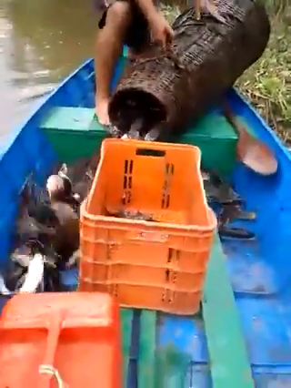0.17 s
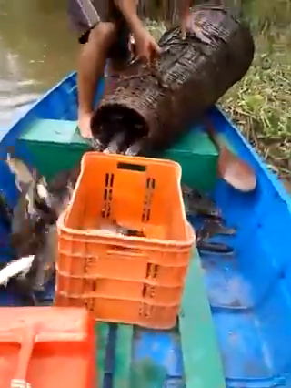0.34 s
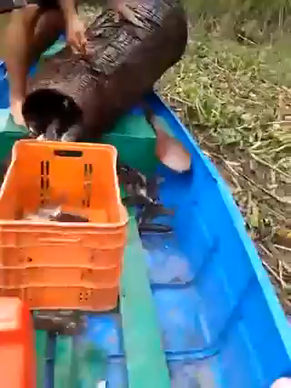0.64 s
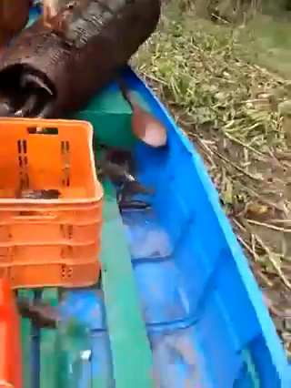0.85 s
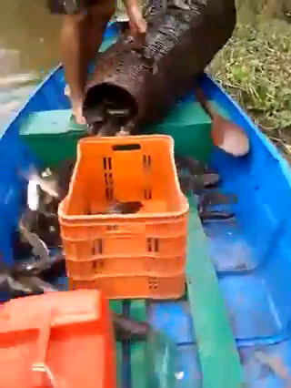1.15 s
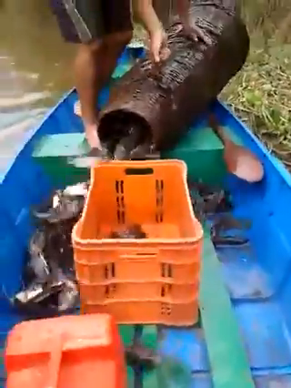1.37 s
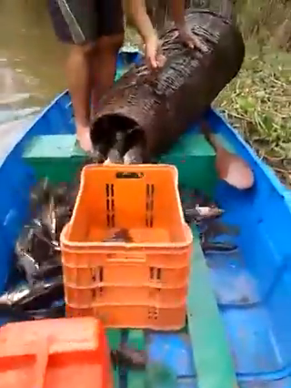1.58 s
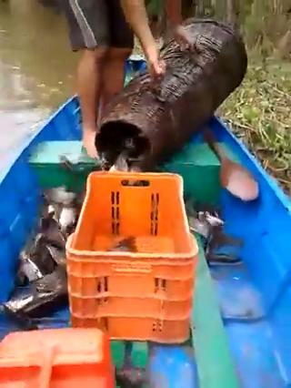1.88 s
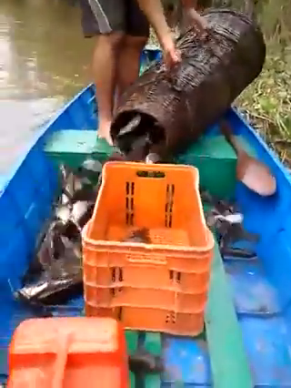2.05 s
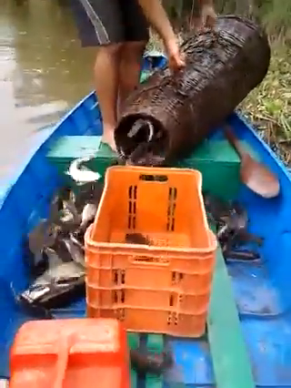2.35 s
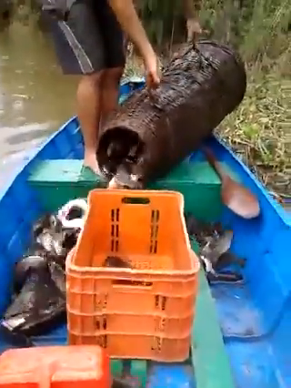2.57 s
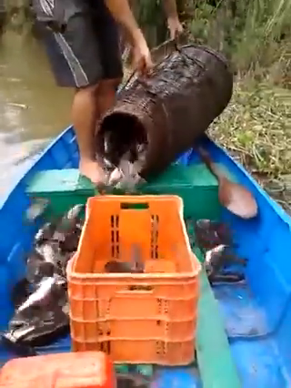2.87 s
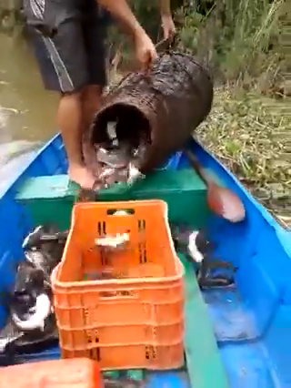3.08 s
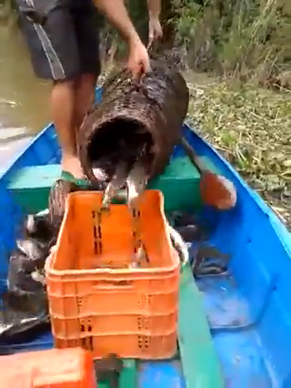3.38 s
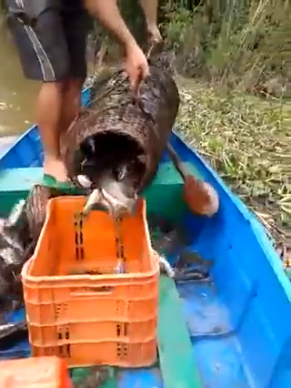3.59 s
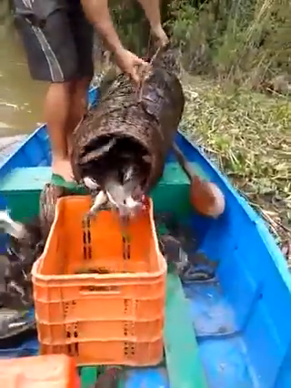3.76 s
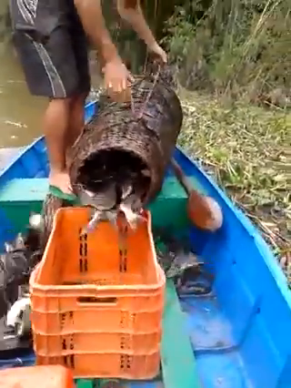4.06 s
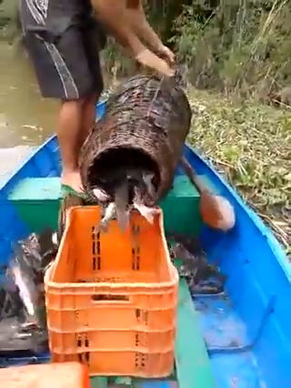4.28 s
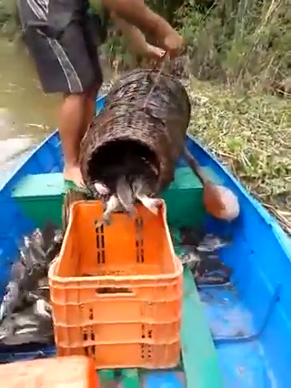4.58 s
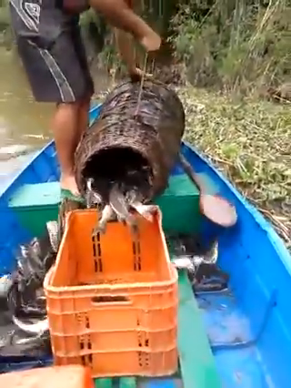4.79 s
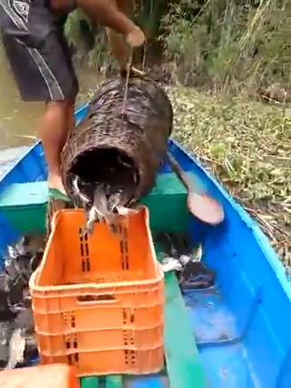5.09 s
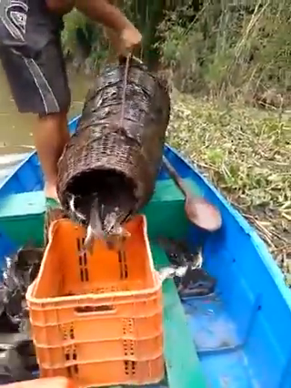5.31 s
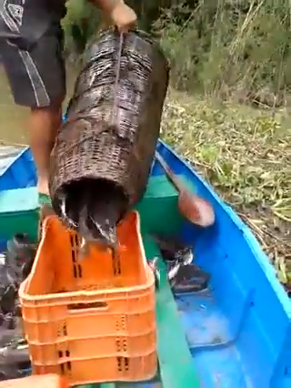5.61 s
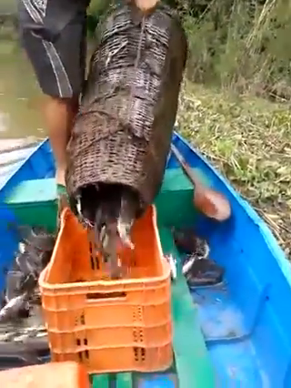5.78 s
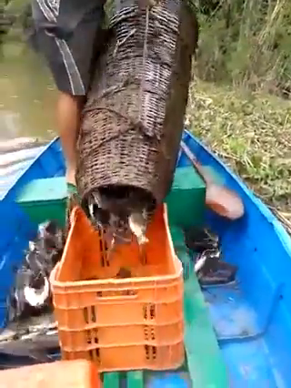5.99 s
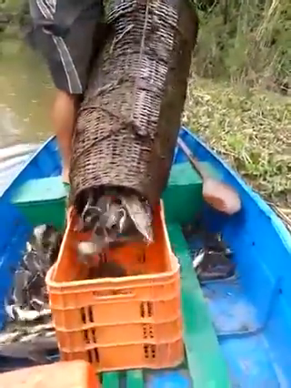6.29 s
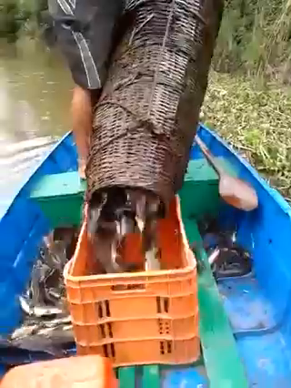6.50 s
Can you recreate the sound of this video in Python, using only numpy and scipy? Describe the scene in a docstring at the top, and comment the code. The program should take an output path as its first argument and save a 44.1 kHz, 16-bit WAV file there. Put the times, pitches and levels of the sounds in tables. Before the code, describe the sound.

Live fish thrash in an open boat and a plastic crate: dull hollow thuds, wet tail slaps and hard knocks, easing, then a late flurry.

```python
"""Dull thuds, wet slaps and hard knocks: live fish thrash in an open boat and drop into a plastic crate,
a couple of metres from a phone. Soft bodies thud on the hull, which booms in its low modes; bony parts
tap the plastic, made as short swings that ring the crate. Wet tails slap and splatter, made as bursts of
noise and tiny droplets. Underneath, a heap of fish drums, slithers and drips; a thin hiss flickers on top."""
import sys
import numpy as np
from scipy import signal
from scipy.fft import rfft, irfft
from scipy.io import wavfile
from scipy.ndimage import uniform_filter1d

SR = 44100
rng = np.random.default_rng(int(sys.argv[2]) if len(sys.argv) > 2 else 0)


def field_ratio(decibels):
    """Amplitude ratio for a level in dB (20 dB per decade); scalars and array-likes work."""
    return 10 ** (np.asarray(decibels, dtype=float) / 20)


def master(y):
    """Save y as 16-bit WAV."""
    cut = np.clip(np.atleast_2d(y).T, -1, 1)
    pcm = np.round(cut * 32767)  # scale
    wavfile.write(sys.argv[1], SR, pcm.astype(np.int16))


N = 293078  # length in samples
T = np.arange(N) / SR  # time in seconds
COMMON = 0.88  # random sizes leave out the rarest, largest ones
CREST_DB = 12.0  # a noise burst peaks about this far over its rms


def unit(x):
    """Scale to rms 1."""
    return x / np.sqrt(np.mean(x ** 2))


def colour(x, points):
    """Filter by (Hz, dB) points joined on a log frequency axis."""
    hz, db = np.transpose(points)
    bins = np.arange(N // 2 + 1) * SR / N + 1  # 1 Hz up, so that the log exists at zero
    gain = field_ratio(np.interp(np.log(bins), np.log(hz), db))
    return irfft(rfft(x) * gain, N)


def hiss(points):
    """Coloured noise, rms 1."""
    return unit(colour(rng.standard_normal(N), points))


def add(track, s, sound):
    """Mix a short sound in at time s, in seconds."""
    i = max(int(s * SR), 0)
    track[i:i + len(sound)] += sound[:N - i]


def modes(table):
    """The ring of a struck object: each mode is a sine that fades by 60 dB in its own time."""
    t = T[:SR // 2]
    return sum(field_ratio(db) * hz / SR * np.sin(2 * np.pi * hz * t) * 1000. ** (-t / t60)
               for hz, db, t60 in table)


def random_gain(size, spread_db):
    """Turn even random numbers into gains: mostly small, a few large."""
    return field_ratio(-spread_db * np.log(1 - COMMON * size))


def bursts(per_s, spread_db, rise_s, fade_s):
    """Envelope of bursts at random times: each starts quickly and fades exponentially."""
    when, size = rng.random((4000, 2)).T
    count = int(per_s * N / SR)
    starts = np.zeros(N)
    starts[(when[:count] * N).astype(int)] = random_gain(size[:count], spread_db)
    t = T[:SR // 5]
    shape = (1 - np.exp(-t / rise_s)) ** 2 * np.exp(-t / fade_s)
    return signal.fftconvolve(starts, shape)[:N]


def patter(per_s, spread_db, cycles, low_hz, high_hz, points):
    """Tiny wet contacts: each rings a few cycles at a pitch of its own; coloured, rms 1."""
    out = np.zeros(N)
    for when, size, pitch in rng.random((6000, 3))[:int(per_s * N / SR)]:
        hz = low_hz * (high_hz / low_hz) ** pitch
        turns = hz * T[:int(8 * cycles * SR / hz)]
        swell = turns / cycles * np.exp(-turns / cycles)
        # equal energy per Hz, so that the colour alone sets the spectrum
        gain = random_gain(size, spread_db) * hz
        add(out, when * N / SR, gain * swell * np.sin(2 * np.pi * turns))
    return unit(colour(out, points))


def thuds():
    """A soft body presses a panel for a swing or two; flesh adds a rougher knock; bone taps and cracks."""
    # Body blows on hull and crate. Each row: start in seconds, peak of the swing in dB,
    # pitch of the struck panel in Hz, knock in dB relative to the swing.
    blows = [(0.001, -15.5, 160, -11), (0.021, -20, 265, -1), (0.043, -20.5, 161, -1),
             (0.124, -24.5, 168, 3.5), (0.148, -16.5, 283, -10), (0.163, -14.5, 267, -4.5),
             (0.183, -18.5, 150, -6), (0.262, -24.5, 252, -2), (0.283, -21, 215, -1),
             (0.305, -15.5, 167, -14), (0.326, -18.5, 203, -14), (0.41, -30, 304, 12),
             (0.435, -24.5, 133, 12), (0.461, -16.5, 329, -39), (0.48, -24.5, 319, -23),
             (0.518, -18, 160, -34), (0.539, -23, 319, 0), (0.597, -25.5, 155, 4.5), (0.622, -20, 182, -21),
             (0.697, -9, 159, -10), (0.715, -17.5, 166, -20), (0.798, -17.5, 156, -4.5),
             (0.882, -33, 118, -5), (1.018, -19, 152, -27), (1.0322, -16.5, 182, -19),
             (1.15, -22, 222, -11), (1.222, -16, 121, -11), (1.24, -11.5, 48, -22), (1.248, -9, 140.5, -4),
             (1.268, -10, 347, -1.5), (1.299, -14, 125, -32), (1.331, -23, 198, 4.5),
             (1.362, -15.5, 125, -14), (1.393, -23, 139, -5), (1.427, -22, 155, -6), (1.456, -18, 148, -5),
             (1.588, -10, 152, -14), (1.608, -13, 128, -11), (1.759, -7.5, 193, -7),
             (1.778, -13.5, 161, -27), (1.793, -20, 204, -10), (1.833, -20.5, 178, 1),
             (1.865, -20.5, 332, -2), (1.88, -24.5, 332, -12), (2.044, -15.5, 167.6, -2),
             (2.073, -22.5, 197, -22), (2.096, -20, 198, -25), (2.111, -21.5, 165, -22),
             (2.174, -27, 199, 6.5), (2.23, -22.5, 221, -1), (2.259, -27, 148, -17.5),
             (2.296, -27, 310, 2.5), (2.305, -22, 134, -17), (2.342, -20.5, 151, -9),
             (2.398, -29, 281, 12.5), (2.509, -27.5, 245, 4.5), (2.546, -24.5, 325, 7),
             (2.569, -28.5, 196, -3), (2.768, -2, 166, -9.5), (2.79, -18.5, 171, -7.5),
             (2.88, -26.5, 229, 8), (2.926, -5, 277, -4.5), (2.941, -9.5, 280, -5.5), (2.954, -16, 263, -4),
             (2.968, -8, 160, -11), (2.98, -13, 245, -9), (2.993, -15.5, 163, -8), (3.01, -22.5, 153, -1),
             (3.031, -19, 170, -17), (3.053, -27.5, 219, -8), (3.169, -18.5, 250, -1),
             (3.181, -17, 164, -14), (3.2, -22.5, 244, -3.5), (3.234, -24.5, 178, -8),
             (3.358, -23.5, 143, 3.5), (3.41, -21.5, 112, -2), (3.44, -21, 207, -13),
             (3.516, -20, 114, -2.5), (3.567, -15, 209, -5.5), (3.59, -19, 198, -18), (3.746, -29, 316, -4),
             (3.815, -22, 160, 1.5), (3.842, -31.5, 245, 10.5), (3.888, -20, 290, 0.5),
             (3.908, -28.5, 334, 7), (3.922, -22, 327, -13), (3.945, -26, 318, -36), (4.001, -28, 366, 3.5),
             (4.092, -34, 304, 2), (4.422, -31, 96, 0), (4.447, -25, 152, -0.5), (4.464, -35.5, 160, 5),
             (4.557, -25.5, 157, -9), (4.624, -35, 290, 6), (4.642, -23.5, 173, -9.5),
             (4.917, -29.5, 162, -14), (4.94, -28.5, 150, -0.5), (5.078, -31, 430, -11),
             (5.115, -22.5, 202, -3), (5.137, -23, 190.6, -18), (5.546, -32, 220, 0),
             (5.576, -29, 138, -7.5), (5.591, -29.5, 170, -4), (5.66, -27, 178, -8),
             (5.719, -34.5, 286, 10.5), (5.948, -30.5, 273, 3), (5.997, -32, 197, -2),
             (6.073, -23.5, 166, 2.5), (6.101, -25, 201, -2.5), (6.117, -34, 199, -16),
             (6.242, -29, 140, 1), (6.3, -19.5, 397, -6), (6.317, -18, 346, -1), (6.34, -7.5, 282, -7.5),
             (6.357, -8.5, 273, -15), (6.369, -11.5, 184, -14), (6.383, -20.5, 159, -14),
             (6.401, -13.5, 157, -17), (6.462, -18, 254, 0), (6.473, -23, 173, -12), (6.49, -20, 192, -8),
             (6.521, -30, 256, -1), (6.546, -31, 253, -11.5), (6.561, -40, 196, -11),
             (6.594, -19.5, 140, -25), (6.616, -34.5, 198, 4), (6.625, -25.5, 393, -12.5)]
    # Hard taps of a head or spine on plastic. Each row: start in seconds, peak in dB,
    # pitch in Hz, contact time in milliseconds.
    bone_taps = [(0.13, -31, 770, 1.7), (0.153, -23, 775, 1.4), (0.282, -27, 790, 0.9),
                 (0.439, -19.5, 573, 1.9), (0.525, -30.5, 865, 1.8), (0.864, -37, 788, 11),
                 (0.91, -36, 790, 6.5), (0.979, -33.5, 775, 2.5), (1.031, -8.5, 650, 0.77),
                 (1.188, -28.5, 1094, 2.1), (2.03, -28, 770, 2), (2.136, -30, 1000, 2),
                 (2.175, -28, 1000, 0.97), (2.295, -25, 590, 1.2), (2.3985, -16, 900, 1),
                 (2.4015, -13, 600, 0.8), (2.408, -16.5, 450, 0.91), (2.7725, -11.5, 714, 1.6),
                 (2.884, -23, 874, 1.4), (2.932, -7, 700, 0.58), (2.937, -17.5, 1364, 1.8),
                 (2.942, -12.5, 774, 1.6), (2.95, -22.5, 1090, 1.3), (2.965, -17, 840, 1.1),
                 (3.265, -33.5, 795, 3.6), (3.448, -27, 950, 1.2), (3.525, -35, 960, 1.9),
                 (3.83, -28, 1050, 1.8), (5.078, -27, 610, 0.79), (5.083, -23.5, 595, 0.49),
                 (5.122, -26, 950, 1), (5.549, -26.5, 603, 0.76), (5.724, -27.5, 597, 0.5),
                 (6.245, -25, 790, 1.2), (6.266, -27, 800, 1.5), (6.305, -39.5, 990, 0.43),
                 (6.343, -28, 905, 1.5), (6.461, -22.5, 940, 1.1), (6.494, -34, 900, 1.3)]
    # Ringing of the plastic crate. Each row: pitch in Hz, relative level in dB,
    # time to fade by 60 dB in seconds.
    crate_modes = [(479, -26, 0.075), (590, -22, 0.14), (797, -19, 0.095), (1040, -24.5, 0.047),
                   (1326, -29.5, 0.09), (1490, -23, 0.08), (1841, -30, 0.04)]
    contact_s = 0.0089
    peak_at, fade_shape = 0.81, 1.16  # peak in contact times; shape 1 = exponential fade, 2 = abrupt
    crack_db, crack_db_per_ms = -9.5, -12.5  # relative to the tap; a longer contact cracks less
    crack_fade_s = 0.0011
    force, knock, tap, crack = np.zeros((4, N))
    t = T[:SR // 5]
    for s, db, hz, knock_db in blows:
        u = t / contact_s
        fade = np.exp(2 * (1 - (u / peak_at) ** fade_shape) / fade_shape)
        press = u ** 2 * fade / peak_at ** 2
        add(force, s, -field_ratio(db) * press * np.sin(2 * np.pi * hz * t))
        add(knock, s, field_ratio(db + knock_db - CREST_DB) * u ** 2 * np.exp(2 - 1.615 * u))
    for s, db, hz, ms in bone_taps:
        u = t * 1000 / ms
        press = u ** 1.5 * np.exp(1.66 * (1 - u))
        add(tap, s, -field_ratio(db) * press * np.sin(2 * np.pi * hz * t))
        add(crack, s, field_ratio(db + crack_db + crack_db_per_ms * ms) * np.exp(-t / crack_fade_s))
    flesh = hiss([(50, -14.5), (200, 4.0), (450, -2.0), (1000, -17.5), (1600, -28.5),
                  (3000, -49.0), (6000, -97.0)])
    dry_crack = hiss([(600, -5), (1500, -3.0), (5000, -8), (10000, -20.5), (16000, -15.0)])
    crate = signal.fftconvolve(tap, modes(crate_modes))[:N]
    return hull(force + knock * flesh + tap) + crate + crack * dry_crack


def hull(force):
    """The blows, the ringing they leave in the hull's modes, and the dull rattle of ribs and boards."""
    # Ringing of the hull. Each row: pitch in Hz, relative level in dB, time to fade by 60 dB in seconds.
    hull_modes = [(120.6, 7, 0.29), (152, -19, 0.68), (177, 7.5, 0.12), (212, -21.5, 0.059),
                  (326, -8.5, 0.9), (381.7, 0, 0.67), (516, -1, 0.55), (575, 13.5, 0.029),
                  (800, -5.5, 0.062), (1550, -31, 0.065)]
    t = T[:SR // 2]
    rattle = hiss([(40, -6.0), (150, -3.5), (400, -2.5), (900, -10.0), (1600, 0.5), (5000, -15.0)])[:len(t)]
    rattle = rattle * (1 - np.exp(-t / 0.0028)) * 1000. ** (-t / 0.21)
    ring = field_ratio(-20.5) * modes(hull_modes) + field_ratio(-43.5) * rattle
    return force + signal.fftconvolve(force, ring)[:N]


def slaps():
    """A wet tail slap: droplets over hiss swell in a few milliseconds; flat slaps carry more middle."""
    # Wet tail slaps. Each row: time in seconds, peak in dB, middle in dB relative to that peak.
    tail_slaps = [(0.001, -29.5, 3.5), (0.022, -41.5, 18.5), (0.039, -44.5, 3.5), (0.093, -37, 11),
                  (0.1503, -34.5, 9), (0.176, -41, 14), (0.241, -43, -10), (0.2596, -52.5, 22),
                  (0.2865, -34.5, 6), (0.306, -46.5, 17), (0.369, -40, 13.5), (0.3965, -36.5, 5),
                  (0.4334, -34, 6.5), (0.462, -40.5, -12), (0.524, -43, 8.5), (0.5427, -37, -5),
                  (0.593, -51.5, 14.5), (0.619, -40.5, 14), (0.656, -52, 21.5), (0.69, -32, 4.5),
                  (0.736, -46, 11), (0.781, -39, 7.5), (0.838, -38, -5), (0.862, -34.5, 6),
                  (0.9354, -40, 13.5), (0.899, -35, 5), (0.974, -38, 11.5), (0.994, -35.5, -4),
                  (1.1118, -45.5, 21), (1.157, -35, -29), (1.245, -42.5, 13.5), (1.27, -54, 28),
                  (1.329, -44, 11), (1.357, -56, 20), (1.424, -42, 10.5), (1.463, -37, 8.5),
                  (1.5, -38.5, -4), (1.574, -33, 6), (1.632, -54, 28), (1.659, -33.5, -10),
                  (1.708, -36.5, 6), (1.7285, -27.5, 3.5), (1.7555, -25.5, 2.5), (1.816, -34.5, 8),
                  (1.841, -36, 14.5), (2.041, -37, 7.5), (2.138, -38.5, -9), (2.167, -34, 11),
                  (2.232, -36.5, -13), (2.2918, -33, -25), (2.397, -26, 8), (2.461, -39.5, 7.5),
                  (2.4992, -43, 14), (2.616, -38, 8.5), (2.685, -39, 8), (2.797, -39.5, -10),
                  (2.879, -38, 11), (2.929, -21, 9.5), (3.052, -42, 11), (3.105, -39, -23),
                  (3.143, -32.5, -1), (3.229, -44, 9), (3.327, -44.5, 16.5), (3.352, -31, 6.5),
                  (3.429, -42, 16.5), (3.452, -57, 15), (3.498, -42, 10.5), (3.521, -38, 11.5),
                  (3.607, -38, 8), (3.83, -27, 7), (3.9, -42.5, 14.5), (3.928, -35, 5.5), (4.001, -35, 9.5),
                  (4.021, -35.5, -25), (4.064, -42, 4), (4.172, -44.5, 14.5), (4.442, -38.5, 10.5),
                  (4.622, -42, 10), (4.6397, -38, 3.5), (4.789, -46, 7), (4.958, -55.5, 22),
                  (5.081, -45.5, 12.5), (5.1217, -31.5, 6), (5.286, -41, 5), (5.5977, -36, -10),
                  (5.627, -40, 13.5), (5.665, -43, 8), (5.725, -39, 10.5), (5.92, -43.5, 6),
                  (5.9904, -35.5, -12), (6.074, -58, 24.5), (6.244, -36, 4.5), (6.265, -36.5, 6.5),
                  (6.3022, -19, 9), (6.46, -34, 14), (6.491, -33, 3), (6.5127, -47.5, 23), (6.555, -42, 15),
                  (6.612, -30.5, 11)]
    # Colour of the bright splatter. Each row: frequency in Hz, relative level in dB.
    splat_colour = [(800, -2.5), (2000, 0.5), (3000, 11.5), (5000, 5.5), (8000, 8), (10000, 0),
                    (16000, -18.5)]
    # Colour of the duller middle. Each row: frequency in Hz, relative level in dB.
    smack_colour = [(300, -24.5), (800, 7), (1500, -1.5), (2800, -5.5), (4000, -57)]
    usual_fade_s, usual_db = 0.005, -31.5
    shorter_db_per_db = 0.16  # harder slaps are shorter
    tail_db, tail_s = -16.5, 0.028  # water thrown by a slap lands after it
    bright, dull = np.zeros((2, N))
    t = T[:SR // 5]
    for s, db, dull_db in tail_slaps:
        u = t / usual_fade_s * field_ratio(shorter_db_per_db * (db - usual_db))
        add(bright, s - 0.002, field_ratio(db - CREST_DB) * u ** 1.15 * np.exp(0.96 * (1 - u)))
        swell = u * np.exp(1 - u ** 0.9)
        thrown_water = field_ratio(tail_db) * np.minimum(u, 1) * np.exp(-t / tail_s)
        add(dull, s - 0.001, field_ratio(db + dull_db - CREST_DB) * (swell + thrown_water))
    spray = field_ratio(-11.5) * hiss([(8000, -35.5), (11000, -5.0), (16000, -1)])
    splat = 0.7 * hiss(splat_colour) + 0.61 * patter(850., 8.0, 6.0, 1500., 11970.0, splat_colour)
    smack = 0.45 * hiss(smack_colour) + 0.64 * patter(880., 4.3, 4.0, 447.0, 3533.0, smack_colour)
    return bright * (splat + spray) + dull * smack


def heap():
    """Many small unseen blows drum the hull; skins slither and drip in short wet bursts."""
    # The restless heap. Each row: time in seconds, then drumming, slithering and dripping levels in dB.
    s, drum_db, slither_db, drip_db = np.transpose([(0.0, -24, -42.5, -61.5), (0.48, -29, -39, -54),
                                                    (0.87, -27.5, -41.5, -63), (0.999, -25.5, -37, -49),
                                                    (1.2, -28.5, -35.5, -57), (1.35, -17.5, -43, -69),
                                                    (1.55, -31, -38.5, -56), (1.75, -23.5, -37, -54),
                                                    (2.02, -30, -43.5, -59.5), (2.3, -29.5, -40.5, -60.5),
                                                    (2.78, -32, -42.5, -62.5), (3.28, -30.5, -43, -61),
                                                    (3.55, -25.5, -42.5, -67.5), (3.66, -35, -45.5, -59.5),
                                                    (4.02, -32, -47, -64), (4.3, -38, -49, -63),
                                                    (5.0, -39.5, -46, -61.5), (5.5, -42, -44.5, -59),
                                                    (5.85, -36.5, -41.5, -58), (6.4, -39, -41, -57.5),
                                                    (6.52, -22, -40.5, -54)])
    # Colours of the drumming, slithering and dripping. Each row: frequency in Hz, relative level in dB.
    rumble_colour = [(20, 20), (45, -7.5), (100, 13.5), (160, 12), (300, 7.5), (600, -8.5), (1100, -23.5),
                     (3000, -61.5)]
    slither_colour = [(250, 8.5), (500, -1.5), (800, 2.5), (1100, -2), (1600, -11), (2800, -14.5),
                      (3600, -67)]
    drip_colour = [(1500, -22.5), (3200, 2.5), (5000, -2), (8500, -1), (10000, -5), (12000, -38.5),
                   (16000, -37)]
    small_blows = 0.56 + bursts(70., 2.5, 0.014, 0.011)
    drum = hull(small_blows * hiss(rumble_colour))
    rubbing = 0.74 + bursts(46.0, 4.7, 0.0011, 0.0056)
    wet_skin = 1.37 * hiss(slither_colour) + patter(800., 1.8, 3.53, 352.7, 3715.0, slither_colour)
    slither = hull(rubbing * wet_skin)
    dripping = 0.63 + bursts(110.0, 7.9, 0.00031, 0.032)
    drops = hiss(drip_colour) + 0.36 * patter(1100.0, 4.8, 6.3, 2354.0, 11370.0, drip_colour)
    drip = dripping * drops
    layers = (drum_db, drum), (slither_db, slither), (drip_db, drip)
    return sum(field_ratio(np.interp(T, s, db)) * unit(sound) for db, sound in layers)


def top_hiss():
    """Thin, very high noise, flickering in random bursts."""
    flicker = 2.2 + bursts(33.0, 2.5, 0.002, 0.01)
    return field_ratio(-66) * unit(flicker * hiss([(7000, -47.0), (10500, -2.0), (16000, 1)]))


def smooth_db(x):
    """Level in dB, averaged over 31 ms."""
    return 10 * np.log10(uniform_filter1d(x ** 2, int(0.031 * SR)).clip(1e-12))


def drop_weak_treble(x):
    """Each treble band drops out while the whole sound is far louder than the band."""
    # Treble bands, each reaching up to the next. Each row: lower edge in Hz,
    # dB under the whole sound where the band is half gone, softness of the change in dB.
    bands = [(3360, 44.5, 13.5), (6240, 38, 10.5), (9770, 41, 8.5), (12530, 35, 5)]
    upper_edges = [row[0] for row in bands[1:]] + [SR / 2]
    hz, spectrum, out = np.arange(N // 2 + 1) * SR / N, rfft(x), x
    for (low_hz, under_db, soft_db), high_hz in zip(bands, upper_edges):
        band = irfft(spectrum * (hz > low_hz) * (hz <= high_hz), N)
        excess_db = smooth_db(x) - smooth_db(band) - under_db
        shut = 0.5 + 0.5 * np.tanh(excess_db / soft_db)
        out = out - shut * band
    return out


def scene():
    """All sources, one channel."""
    return (thuds() + slaps() + heap() + top_hiss())[None]


def band_limit(x):
    """A steep low-pass at the top of the band."""
    return signal.sosfilt(signal.butter(12, 16450, fs=SR, output="sos"), x)


def record(dry):
    """Loud blows are rounded off, the deepest bass is lost, weak treble drops out, the top is cut."""
    bass_cut = signal.butter(3, 45., "highpass", fs=SR, output="sos")
    top_cut = signal.ellip(8, 0.2, 70, 15600, fs=SR, output="sos")
    rounded = dry / (1 + dry ** 4 / 2) ** 0.25
    heard = signal.sosfilt(bass_cut, rounded)  # the phone loses the deepest bass
    mix = signal.sosfilt(top_cut, drop_weak_treble(heard))
    return band_limit(mix)


dry = scene()
out = record(dry)
master(out)
```